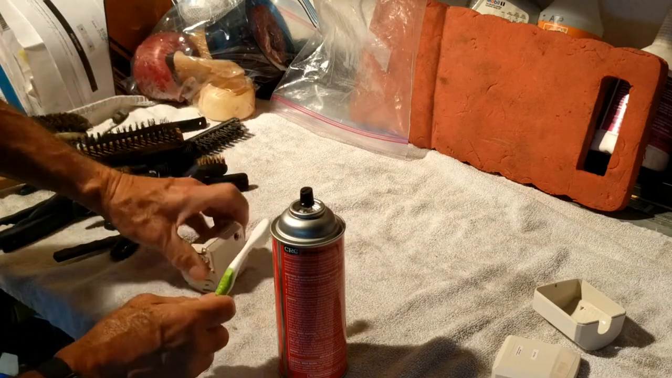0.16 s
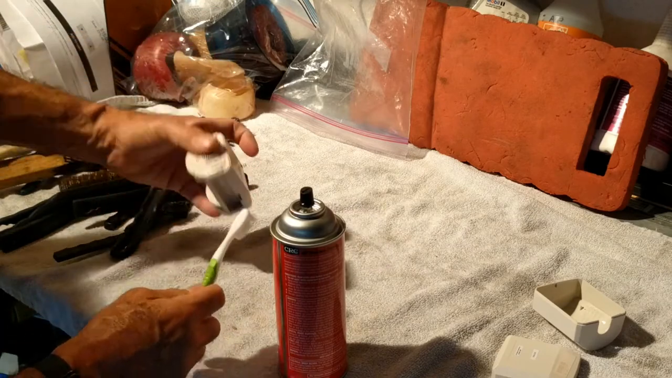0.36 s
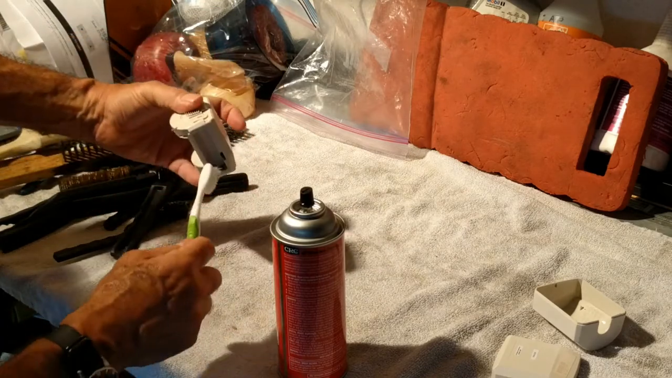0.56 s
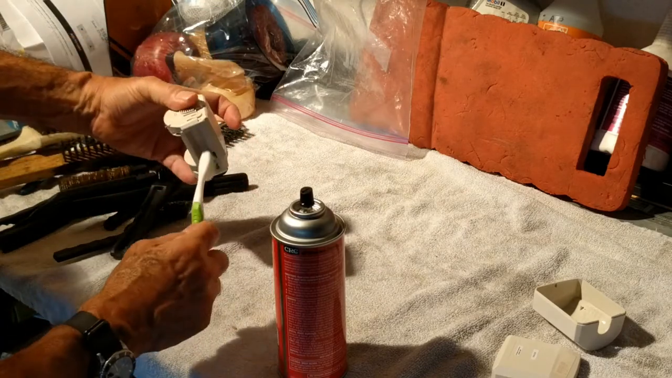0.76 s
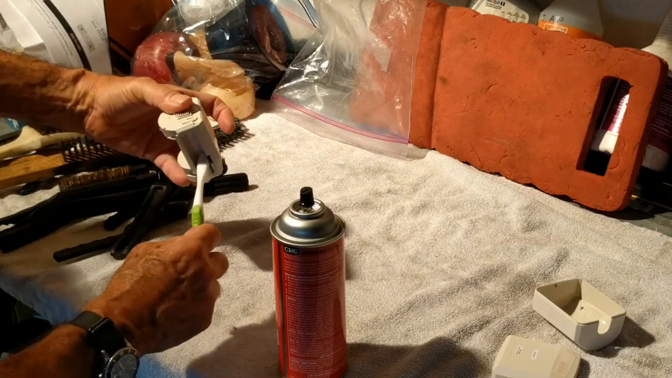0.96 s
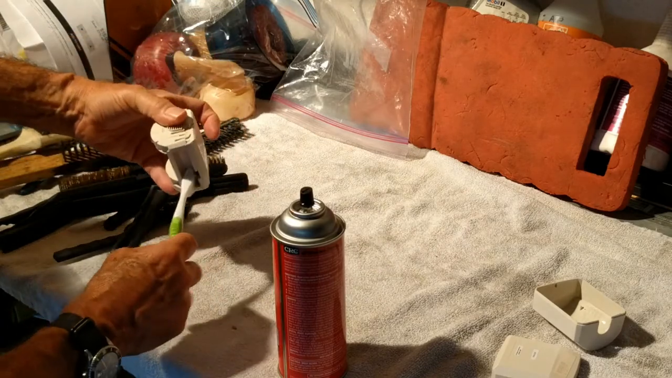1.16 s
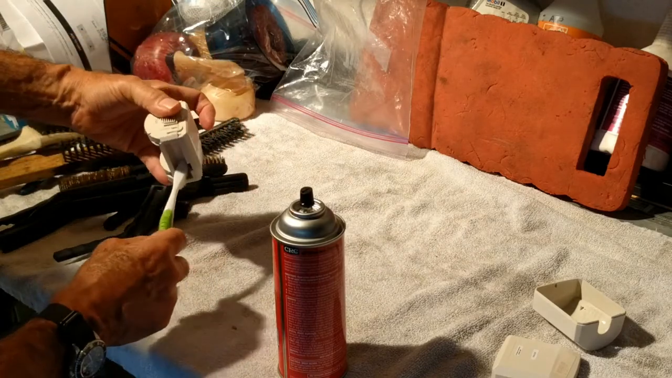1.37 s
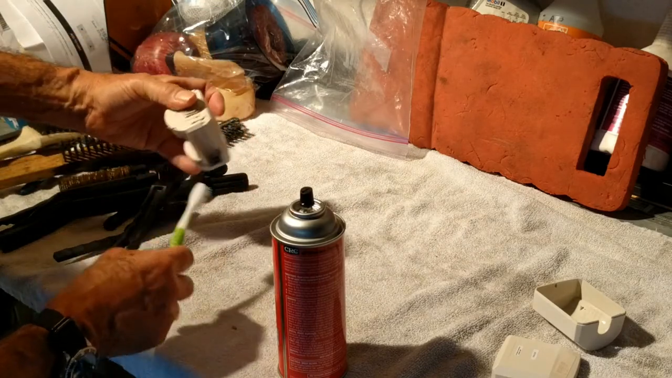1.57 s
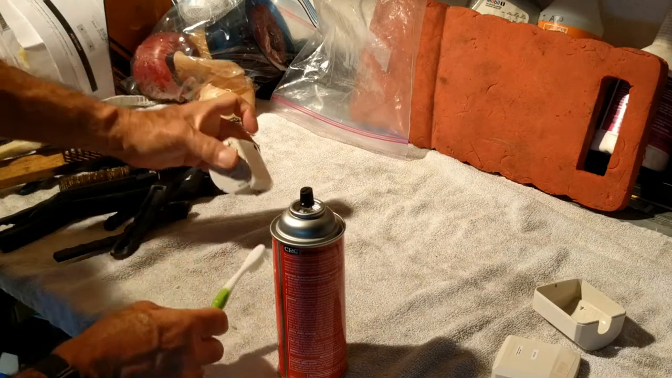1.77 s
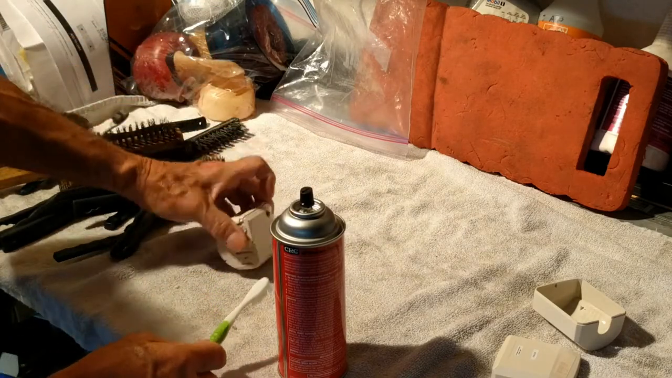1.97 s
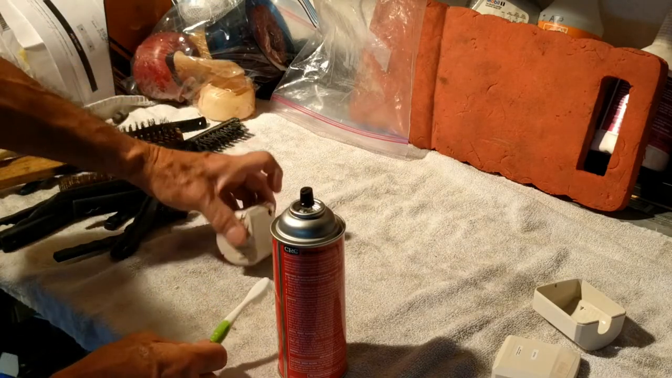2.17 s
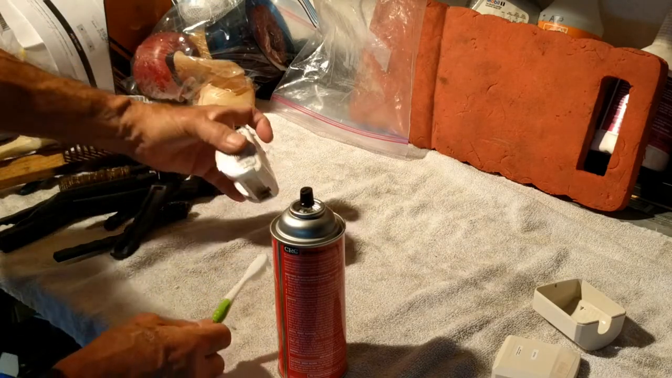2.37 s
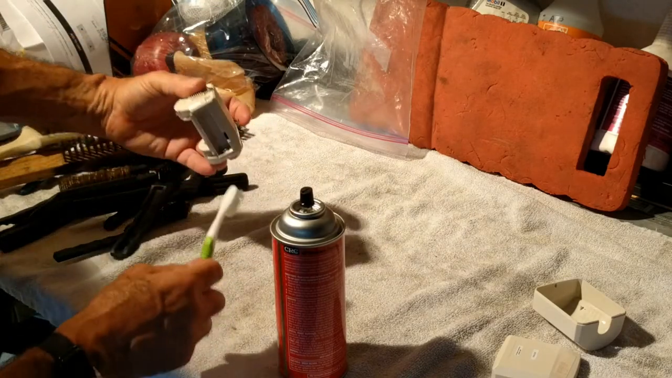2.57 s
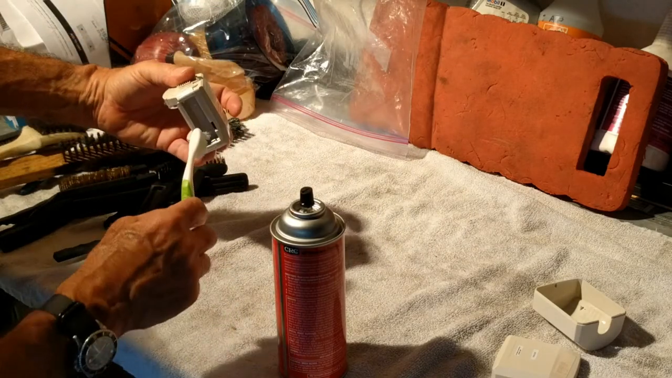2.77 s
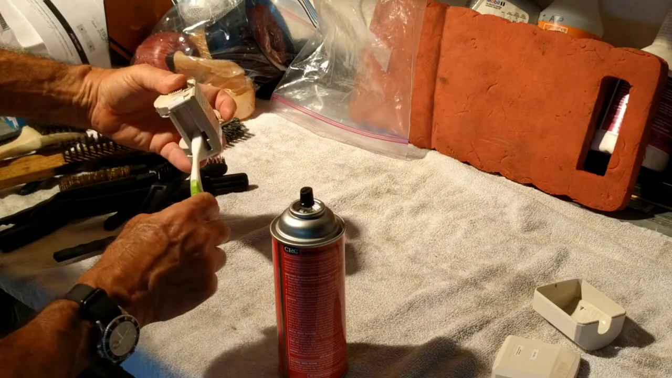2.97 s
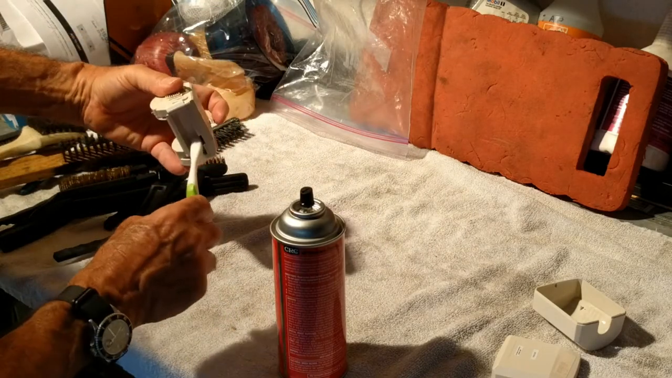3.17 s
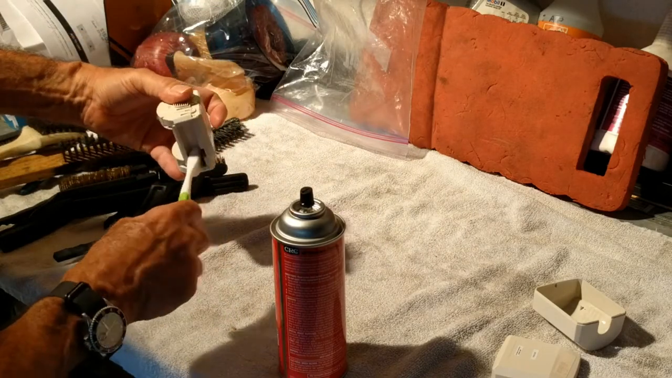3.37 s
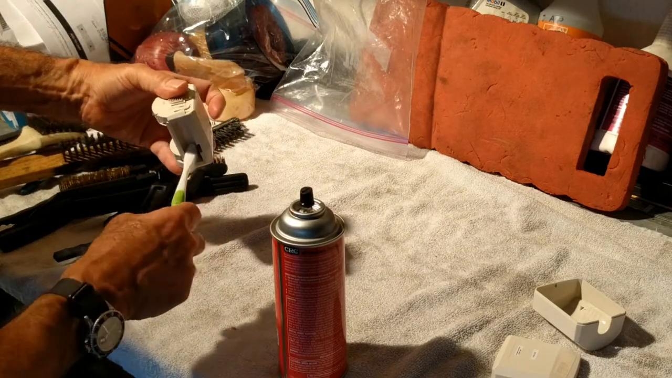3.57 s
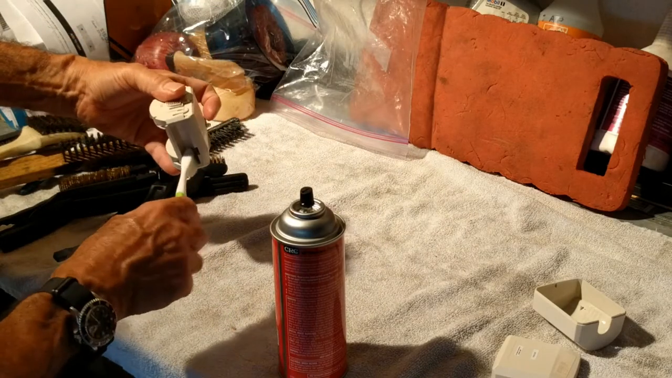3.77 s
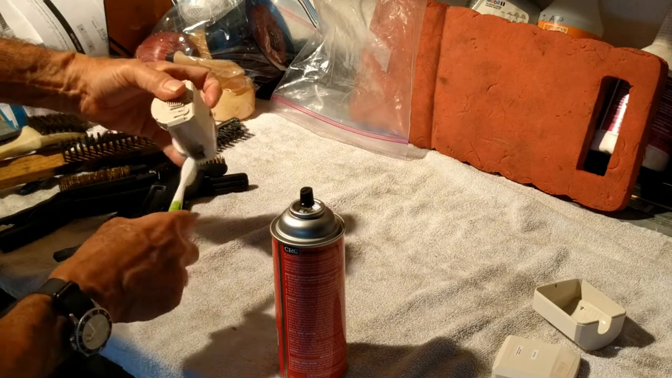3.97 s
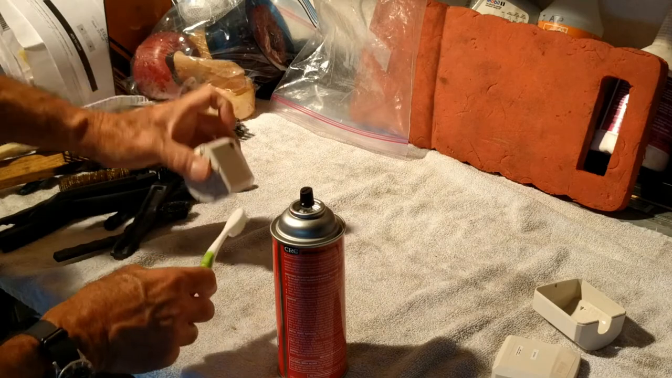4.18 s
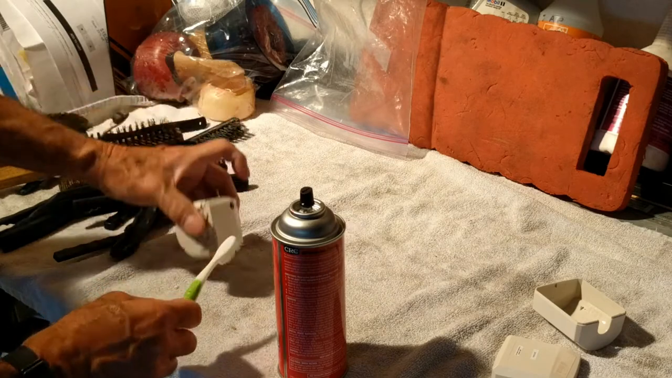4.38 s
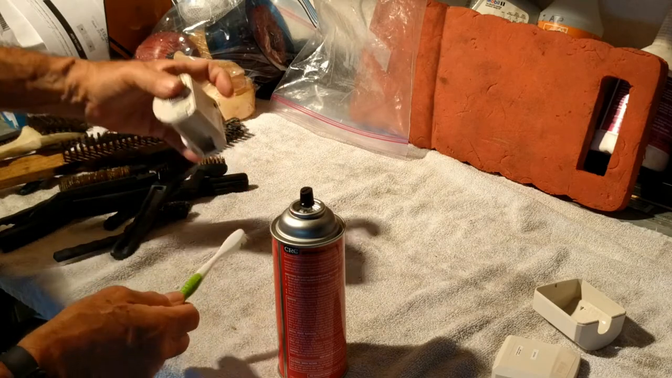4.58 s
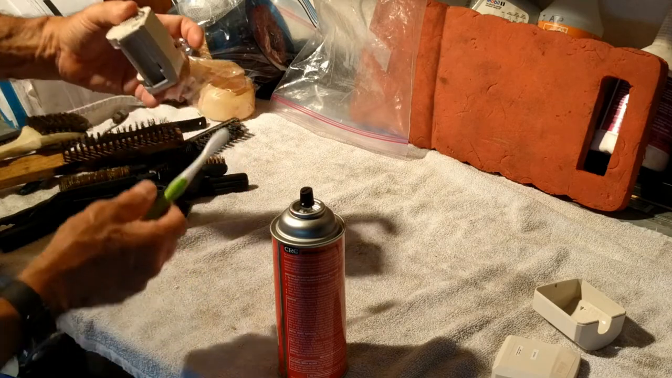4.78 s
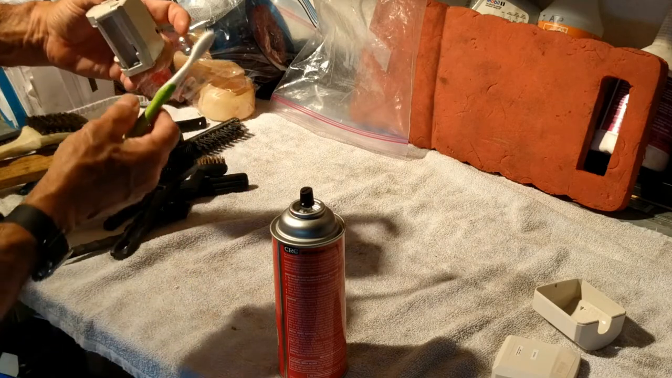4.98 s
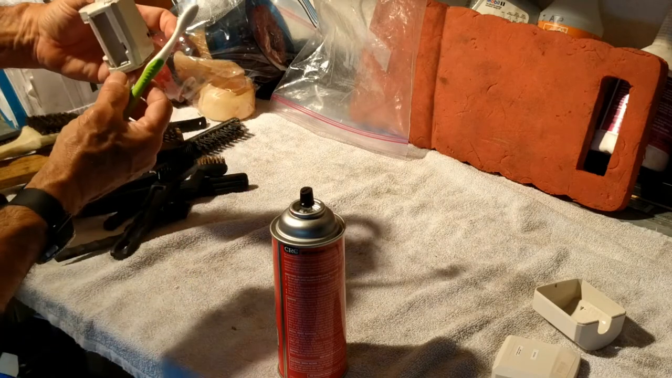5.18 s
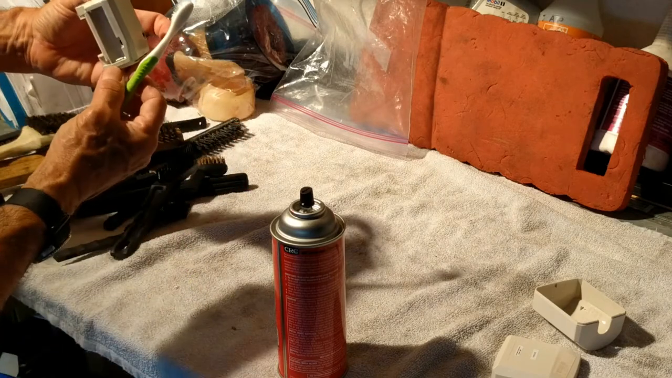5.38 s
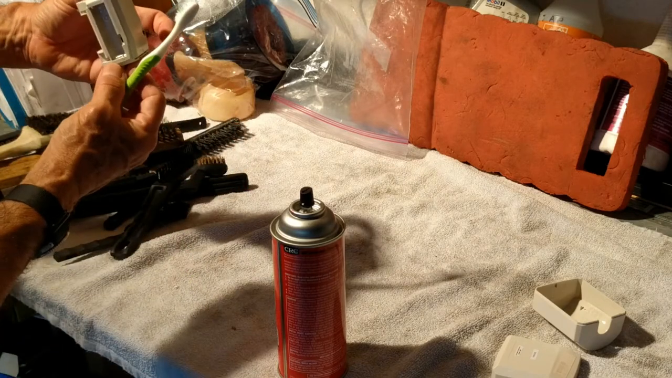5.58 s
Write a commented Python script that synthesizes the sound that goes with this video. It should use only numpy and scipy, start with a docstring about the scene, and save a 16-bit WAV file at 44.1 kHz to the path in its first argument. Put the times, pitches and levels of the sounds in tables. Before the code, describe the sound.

Sharp knocks of plastic on a padded table alternate with a toothbrush clicking and scratching inside a small hollow plastic part.

```python
"""A small plastic battery housing is rapped twice on a towel-covered table, which rings briefly.
Then a toothbrush scrubs its contacts: bristles swish in the hollow shell, the brush head clacks
against its walls, and the brush is pulled out. Two more raps and a second scrub follow.
A last rap, a few handling ticks and one faint clack end the scene.
All along, a hard-walled workroom answers every blow, over a faint hum and hiss."""
import sys
import numpy as np
from scipy import signal
from scipy.fft import rfft, irfft, next_fast_len
from scipy.io import wavfile
from scipy.ndimage import map_coordinates

SR = 44100
rng = np.random.default_rng(int(sys.argv[2]) if len(sys.argv) > 2 else 0)


def persist_wave(psi):
    """Save psi, clipped to +-1, as 16-bit WAV."""
    counts = np.round(np.clip(psi, -1, 1) * 32767).astype(np.int16)
    wavfile.write(sys.argv[1], SR, np.atleast_2d(counts).T)


N = 248724
T = np.arange(SR // 8) / SR  # seconds since the start of one short sound


def amp(db):
    """Turn decibels into a gain."""
    return 10 ** (np.asarray(db) / 20)


def unit(x):
    """Scale a sound to an average (rms) level of 1."""
    return x / np.sqrt(np.mean(x ** 2) + 1e-20)


def blow(x):
    """Scale a short sound to the energy of one millisecond at full level."""
    return x / np.sqrt(np.sum(x ** 2) / (SR / 1000) + 1e-20)


def along(points, hz):
    """Read a value between (Hz, value) points, on a log frequency axis."""
    f, v = np.transpose(points)
    return np.interp(np.log(hz + 1), np.log(f + 1), v)


def coloured(x, points):
    """Give a sound the tone colour drawn by (Hz, dB) points."""
    m = 2 * next_fast_len(len(x))
    gain = amp(along(points, np.fft.rfftfreq(m, 1 / SR)))
    cepstrum = irfft(np.log(gain))
    # folding this in half keeps the filter from ringing before a hit
    cepstrum[1:m // 2] *= 2
    cepstrum[m // 2 + 1:] = 0
    return irfft(rfft(x, m) * np.exp(rfft(cepstrum)))[:len(x)]


def fade(t, t60):
    """Die away by 60 dB in t60 seconds, the ring time."""
    return np.exp(-np.log(1000) * t / t60)


def add(track, start, x):
    """Mix x into the track from start, in seconds."""
    part = track[max(round(start * SR), 0):][:len(x)]
    part += x[:len(part)]


def ring(modes, scatter_db, attack, emphasis_db=0, detune=0):
    """A struck object's fading notes, at new strengths each time; a changing grip detunes them."""
    hz, db, t60 = np.transpose(modes)[:, :, None]
    hz = hz * (1 + detune * rng.standard_normal(hz.shape))
    size = amp(db + emphasis_db + scatter_db * rng.standard_normal(hz.shape))
    waves = np.sin(2 * np.pi * (hz * T + rng.random(hz.shape)))
    return blow((size * waves * fade(T, t60)).sum(0) * (1 - np.exp(-T / attack)))


def crack(colour, t60, attack):
    """A hard contact: so many quickly dying high notes that they blur into noise."""
    burst = rng.standard_normal(len(T)) * fade(T, t60) * (1 - np.exp(-T / attack))
    return blow(coloured(burst, colour))


# The hum's tones. Each row: pitch in Hz, relative level in dB.
HUM_TONES = [(64.6, -69.5), (269.2, -75), (463.0, -88), (538.3, -76)]
# The colour of the rumble and hiss. Each row: frequency in Hz, relative level in dB.
HISS_COLOUR = [(20, -22), (32, -19.5), (42, -0.5), (65, 2.5), (95, -5), (125, 1), (150, -8.5), (270, -14),
               (450, -18), (1000, -21.5), (3000, -27), (8000, -28.5), (10500, -23.5), (15000, -27)]
def background():
    """Low room rumble, hiss and a few slightly unsteady hum tones."""
    t = np.arange(N) / SR
    hum = np.zeros(N)
    for hz, db in HUM_TONES:
        drift = map_coordinates(rng.standard_normal(32), [4 * t])
        hum += amp(db) * np.sqrt(2) * np.sin(2 * np.pi * hz * t + 0.21 * drift)
    hiss = unit(coloured(rng.standard_normal(N), HISS_COLOUR))
    return amp(-1) * hum + amp(-59.5) * hiss


# How long the room echoes. Each row: frequency in Hz, ring time in seconds.
ECHO_TIMES = [(100, 1), (450, 0.39), (1500, 0.42), (5000, 0.5), (10000, 0.44), (16000, 0.53)]
# The colour of the echo. Each row: frequency in Hz, relative level in dB.
ECHO_COLOUR = [(25, -33), (60, -13), (130, -26), (250, 18), (450, 5.5), (700, 3.5), (1500, 1.5),
               (3000, -0.5), (6000, -2), (15000, 1.5)]
def room_response(early_db=-5, early_t60=0.1, build_s=0.031):
    """Nearby clutter answers at once; the far walls' echo builds later and lasts longest in the bass."""
    hz, t, bands = signal.stft(rng.standard_normal(SR * 3 // 4), SR, nperseg=256)
    bands = bands * fade(t, along(ECHO_TIMES, hz)[:, None]) * amp(along(ECHO_COLOUR, hz))[:, None]
    tail = signal.istft(bands, SR, nperseg=256)[1]
    t = np.arange(len(tail)) / SR
    tail *= 1 - np.exp(-(t / build_s) ** 2)
    early = rng.standard_normal(len(t)) ** 3 * fade(t, early_t60) * (t > 0.003)
    return amp(early_db) * early / np.linalg.norm(early) + tail / np.linalg.norm(tail)


def in_room(source, room_db, count=3):
    """A source sends a different mix of notes each way: one to the listener, the others to the walls."""
    echoes = sum(signal.fftconvolve(source(), room_response())[:N] for _ in range(count))
    return source() + amp(room_db) * echoes / np.sqrt(count)


# Handling ticks. Each row: start in seconds, relative level in dB.
HANDLING_TICKS = [(0.731, -32.5), (1.4727, -22), (1.6307, -19), (1.7883, -21), (2.3154, -32),
                  (2.8504, -34.5), (2.906, -41), (5.0799, -35), (5.1264, -36.5), (5.4343, -39.5),
                  (5.6093, -36.5)]
# Their thin colour. Each row: frequency in Hz, relative level in dB.
TICK_COLOUR = [(1000, -40), (6500, -9.5), (9500, 6.5), (15000, 7), (17000, 6.5)]
def ticks():
    """Tiny dry ticks, nearly all treble, while the housing is handled."""
    out = np.zeros(N)
    for start, db in HANDLING_TICKS:
        add(out, start + 0.0007, amp(db - 7.5) * crack(TICK_COLOUR, t60=0.0043, attack=0.0001))
    return out


# Raps on the table. Each row: start in seconds, then relative levels in dB
# of the whole rap, the table's ring and the plastic's crack.
TABLE_RAPS = [(0.091, -2.5, -12, -15), (0.278, -12, -10, -10), (2.027, -3.5, -10.5, -19.5),
              (2.225, -8, -10.5, -25), (4.374, -5.5, -9, -19)]
# Table and housing ringing together. Each row: pitch in Hz, relative level in dB, ring time in seconds.
TABLE_NOTES = [(199.2, -12, 0.055), (259.5, -18, 0.088), (378.3, -18, 0.11), (483.5, -20.5, 0.17),
               (578, 1, 0.046), (710, -6, 0.012), (868.4, -2.5, 0.042), (1010, -1.5, 0.022),
               (1156, 0.5, 0.022), (1365, -4.5, 0.047), (1496, -0.5, .018), (1784, -15, 0.011),
               (2180, -2, 0.0085), (2500, -7.5, .015)]
# The colour of the plastic's crack. Each row: frequency in Hz, relative level in dB.
PLASTIC_COLOUR = [(30, -40), (200, -4), (700, 6.5), (1400, 2.5), (2000, 2.5), (3000, -2), (6000, -2.5),
                  (9000, -8), (15000, -15)]
def raps(thud_hz=107, settle_s=0.00682):
    """The housing lands on an edge, then flat; the table top rings briefly and gives one low bounce."""
    out = np.zeros(N)
    bounce = blow(np.sin(2 * np.pi * thud_hz * T) * fade(T, 0.055) * (1 - np.exp(-T / 0.014)) ** 2)
    # the towel cushions the second contact, so mostly the low notes answer
    cushion_db = -8 * np.maximum(np.log2(np.array(TABLE_NOTES)[:, :1] / 700), 0)
    for start, db, board_db, crack_db in TABLE_RAPS:
        board = amp(board_db + 1) * ring(TABLE_NOTES, scatter_db=-1.5, attack=0.0006)
        plastic = amp(crack_db + 10.5) * crack(PLASTIC_COLOUR, t60=0.038, attack=0.00044)
        add(out, start + 0.0007, amp(db) * (board + plastic))
        flat_landing = ring(TABLE_NOTES, scatter_db=5, attack=0.00085, emphasis_db=cushion_db)
        add(out, start + settle_s, amp(db + board_db - 2) * flat_landing)
        # the bounce follows the weight of the hand more than the hardness of the hit
        add(out, start + 0.0015, amp(0.4 * db - 19.5) * bounce)
    return out


# Free sweeps of the brush. Each row: fastest moment in seconds, relative level in dB.
BRUSH_SWEEPS = [(1.060, -44), (1.222, -44), (1.374, -43), (1.419, -38), (3.195, -48), (3.270, -46),
                (3.401, -41.5), (3.470, -41.5), (3.562, -39), (3.700, -48.5), (3.881, -48.5),
                (3.920, -43.5), (3.968, -47.5), (4.005, -44)]
# The brush is drawn out. Each row: moment it springs free in seconds, relative level in dB.
BRUSH_EXITS = [(1.653, -33), (4.091, -31.5)]
def strokes():
    """List every bristle movement: middle in seconds, half length in seconds, relative level in dB."""
    moves = [(middle, 0.015, db) for middle, db in BRUSH_SWEEPS]
    for hit, db, _, _ in HEAD_CLACKS:
        moves.append((hit - 0.002, 0.003, db - 26))  # bristles land just before the head
        moves.append((hit + 0.024, 0.013, db - 29.5))  # and drag on after it
    for release, db in BRUSH_EXITS:
        moves.append((release - 0.028, 0.016, db - 9.5))  # the brush is pulled
        moves.append((release, 0.0089, db))  # and springs free
    return moves


# The colour of the swish. Each row: frequency in Hz, relative level in dB.
SWISH_COLOUR = [(400, -47), (850, -14), (1200, -2.5), (1700, -18.5), (2300, -13), (3000, -0.5), (4600, 4.5),
                (6500, 3.5), (9800, 2), (12000, -2), (15500, -4)]
def bristles(flicks_per_s=2600, grit_db=3, ring_db=-11):
    """In each stroke bristles catch and flick free, making a new spot on the housing ring."""
    out = np.zeros(N)
    t = np.concatenate([-T[::-1], T])
    for middle, half_s, db in strokes():
        speed = np.exp(-0.5 * (t / half_s) ** 2)
        slips = rng.random(len(t)) < flicks_per_s / SR * (0.5 + speed)
        flicks = unit(slips * rng.choice([-1, 1], len(t)) * amp(grit_db * rng.standard_normal(len(t))))
        swish = unit(coloured(flicks, SWISH_COLOUR))
        for notes in (HOLLOW_NOTES, WALL_NOTES):
            spot = ring(notes, scatter_db=5, attack=0.0002, detune=0.0326)
            swish += amp(ring_db) * unit(signal.fftconvolve(flicks, spot)[:len(t)])
        add(out, middle + t[0], amp(db - 4) * speed * swish)
    return out


def contact(depth):
    """Relative dB of the hollow's ring and of the sharp edge: both grow as the brush strikes deeper."""
    return -29 + 18.5 * depth, -17 + 10.5 * depth


def opening_emphasis(db, depth, hard_db=-14, boost_db=5, width_octaves=0.33):
    """Extra dB for some of the hollow's notes: deep blows above hard_db stir the higher ones."""
    favoured_hz = 1130 * 2 ** (0.3 * depth * max(db - hard_db, 0))
    octaves_away = np.log2(np.array(HOLLOW_NOTES)[:, :1] / favoured_hz)
    return boost_db * np.exp(-(octaves_away / width_octaves) ** 2)


def pings(ping_t60=0.029):
    """The struck spot pings towards the listener, most clearly when the clack has little edge."""
    out = np.zeros(N)
    for start, db, depth, spot_hz in HEAD_CLACKS:
        _, edge_db = contact(depth)
        ping = ring([(spot_hz, 0, ping_t60)], scatter_db=0, attack=0.0002)
        add(out, start + 0.00056, amp(db - 15 - 0.37 * edge_db) * ping)
    return out


# The brush head hits the housing. Each row: start in seconds, relative level in dB,
# depth from 0 at the rim to 1 deep inside, pitch of the struck spot's ping in Hz.
HEAD_CLACKS = [(0.8933, -14, .25, 3950), (0.924, -18.5, 0.34, 4120), (0.9305, -11, 0.04, 3080),
               (1.1104, -13, 0.61, 3050), (1.273, -14, 0.78, 3110), (1.4169, -15.5, 0.36, 5480),
               (1.4316, -14.5, 0.83, 5250), (1.5428, -24, 0.82, 5010), (1.5689, -24, 0.81, 5040),
               (1.5795, -16.5, 0.96, 5300), (3.0211, -14.5, .35, 3330), (3.0458, -15, 0, 4010),
               (3.1097, -15.5, 0, 3680), (3.1523, -14, 0.7, 3050), (3.2292, -23.5, 0.79, 4900),
               (3.234, -15.5, 0.62, 5220), (3.285, -25, 0.48, 4800), (3.3126, -12.5, .68, 3870),
               (3.4661, -17, 0, 3800), (3.4706, -11.5, 0.0031, 4100), (3.5606, -21.5, 0.36, 3870),
               (3.5744, -21.5, 0.033, 4430), (3.6417, -23, .6, 3970), (3.6553, -12.5, 0.88, 5350),
               (3.7475, -17, .55, 3950), (3.8358, -26.5, 0.61, 3180), (3.984, -25.5, .5, 4380),
               (4.013, -17.5, 0.62, 3910), (4.0182, -22.5, 0.98, 3070), (5.3291, -45.5, .4, 4540)]
# The air inside the housing. Each row: pitch in Hz, relative level in dB, ring time in seconds.
HOLLOW_NOTES = [(1135.3, -3, 0.057), (1322, -3.5, 0.034), (1510, -4.5, 0.018), (1736, 0, 0.017)]
# The housing's walls. Each row: pitch in Hz, relative level in dB, ring time in seconds.
WALL_NOTES = [(2276, -2.5, 0.039), (2334, -2.5, 0.015), (2586, -9.5, 0.057), (3130, -1, 0.02),
              (3360, -1.5, 0.018), (3950, -5, 0.02), (4020, -5.5, 0.012), (4414, -10, 0.059),
              (5095, 0.5, 0.0246), (5735, 0.5, 0.023), (6400, -10.5, 0.019)]
# The colour of a clack's sharp edge. Each row: frequency in Hz, relative level in dB.
EDGE_COLOUR = [(300, -32), (800, -15.5), (1200, -14.5), (2500, -3.5), (5000, -4), (7500, 1), (9700, 0.5),
               (11500, -5.5), (15500, -4)]
def clacks():
    """The brush head ends its strokes on the housing: walls and hollow ring under a sharp edge."""
    out = np.zeros(N)
    for start, db, depth, _ in HEAD_CLACKS:
        hollow_db, edge_db = contact(depth)
        walls = ring(WALL_NOTES, scatter_db=3.5, attack=0.000423, detune=0.023)
        # brush and fingers cover the opening differently from blow to blow
        opening_db = opening_emphasis(db, depth)
        hollow = ring(HOLLOW_NOTES, scatter_db=5.5, attack=0.000957, emphasis_db=opening_db, detune=0.012)
        edge = crack(EDGE_COLOUR, t60=0.008, attack=0.0003) + crack(EDGE_COLOUR, t60=0.03, attack=0.0005)
        clack = amp(-9) * walls + amp(hollow_db + 5) * hollow + amp(edge_db + 1.5) * edge
        add(out, start + 0.00063, amp(db) * clack)
    return out


def scene():
    """Raps, scrubbing and ticks in the workroom, over the background, in one channel."""
    scrubbing = in_room(clacks, room_db=-6.5) + pings() + in_room(bristles, room_db=-11.5)
    return (in_room(raps, room_db=-6) + scrubbing + in_room(ticks, room_db=-28) + background())[None]


def record(dry, top_hz=15550):
    """Cut away the very highest treble, above top_hz."""
    m = next_fast_len(N + SR // 2)
    kept = np.fft.rfftfreq(m, 1 / SR) < top_hz
    return irfft(rfft(dry, m) * kept, m)[..., :N]


dry = scene()
out = record(dry)
persist_wave(out)
```